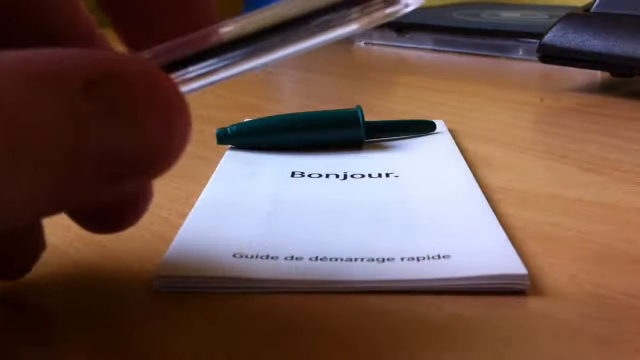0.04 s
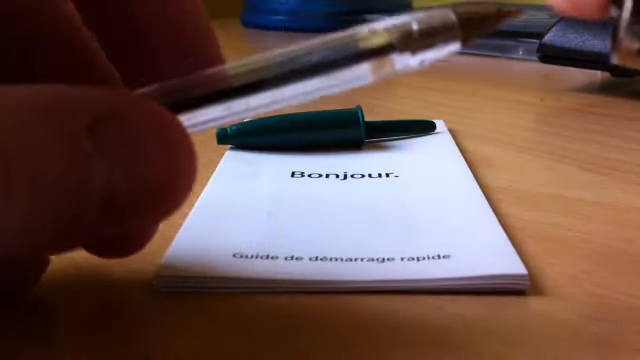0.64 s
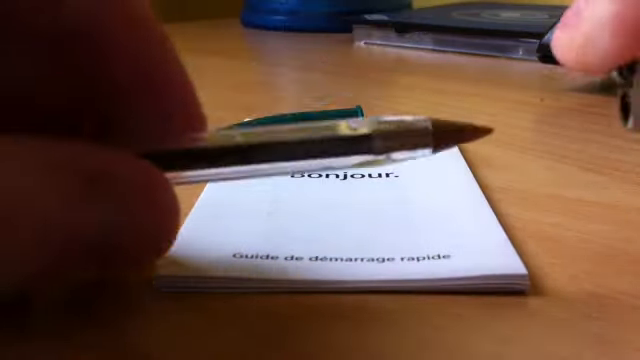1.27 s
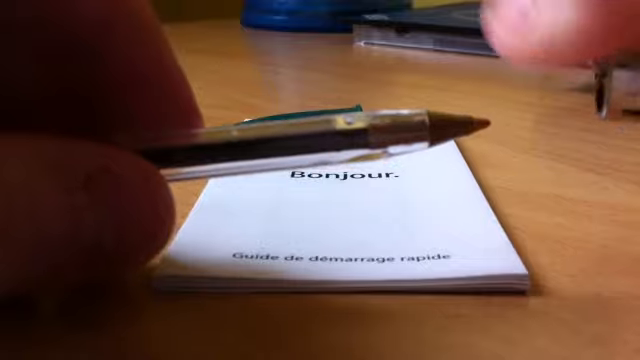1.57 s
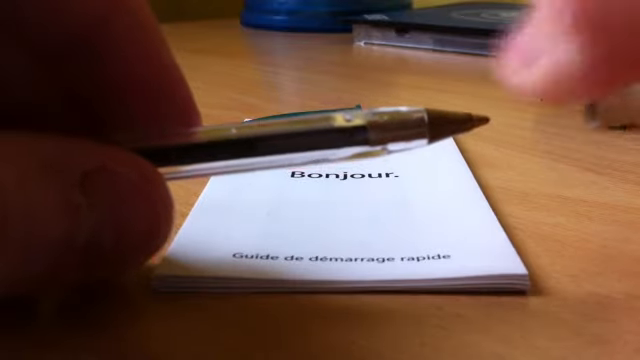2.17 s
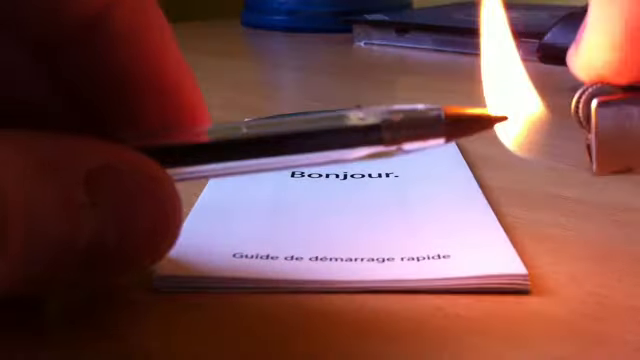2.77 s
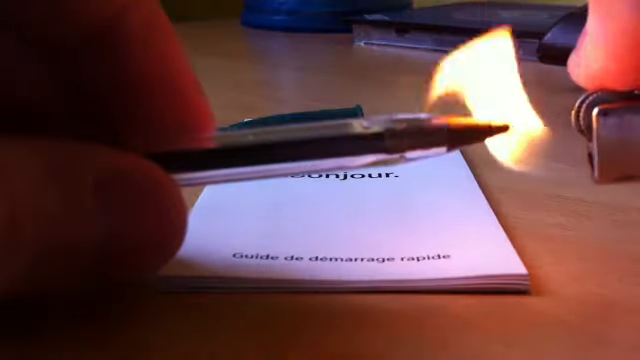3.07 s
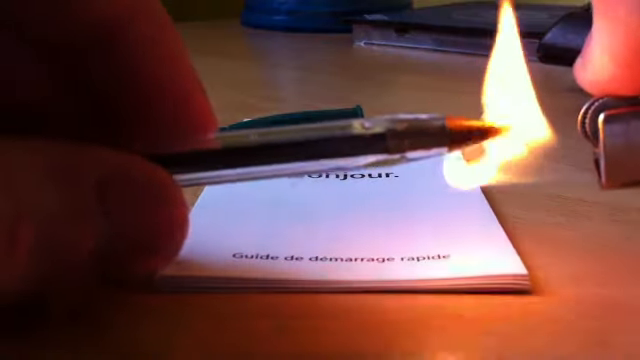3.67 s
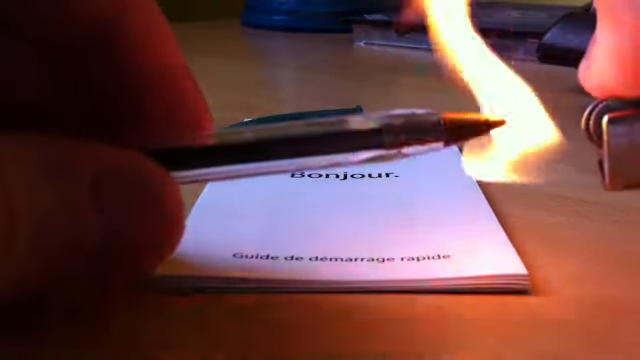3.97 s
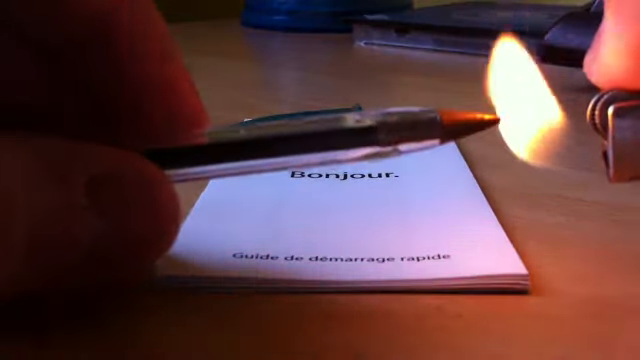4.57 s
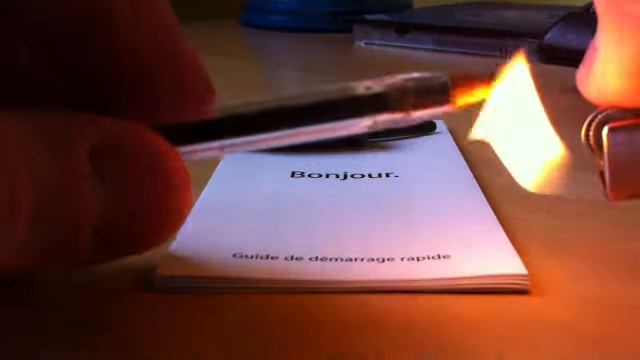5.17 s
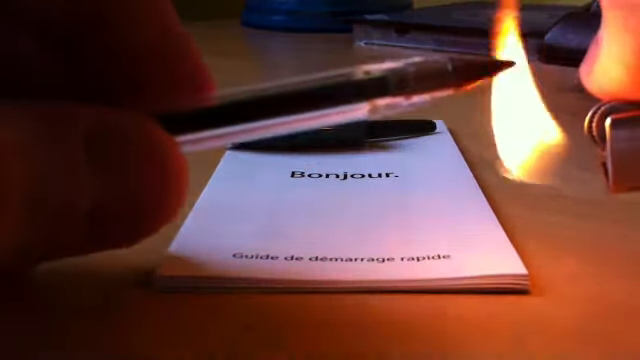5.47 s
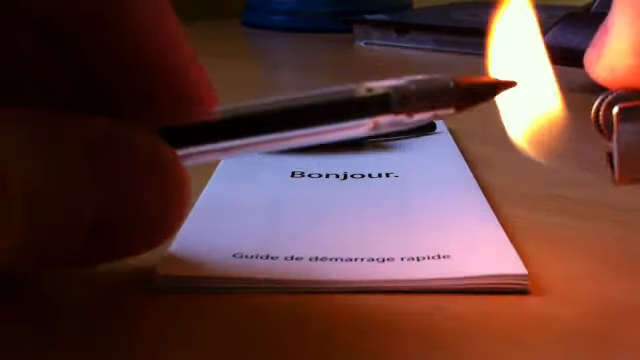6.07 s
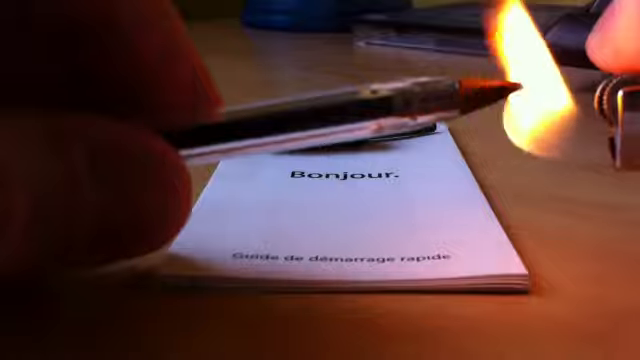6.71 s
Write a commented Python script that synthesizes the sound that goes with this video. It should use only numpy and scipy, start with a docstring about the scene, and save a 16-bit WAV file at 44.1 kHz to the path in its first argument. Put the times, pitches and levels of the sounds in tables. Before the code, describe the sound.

A pocket lighter is worked close to the microphone in a small quiet room. Its lever clicks a few times, letting out short hisses of gas. The wheel scrapes the flint once without catching, then a louder, faster strike with a slight metallic ring lights it. The flame burns on with a faint hollow hiss and gives a few soft pops as it flutters.

```python
"""Flint lighter, close up

A lighter is worked close to the microphone, over a desk in a small quiet room. The lever clicks
and gas hisses from the jet. The wheel scrapes the flint and sets the steel hood ringing: a first
spin fails, a second, faster one lights the gas. The flame burns with a faint hollow hiss from
the air in the hood and gives a few soft pops as it flutters."""
import sys
import numpy as np
from scipy import signal
from scipy.fft import rfft, irfft, next_fast_len
from scipy.io import wavfile

SR = 44100
rng = np.random.default_rng(int(sys.argv[2]) if len(sys.argv) > 2 else 0)


def inscribe(sig):
    """Save sig as 16-bit PCM at rate SR to the path in sys.argv[1].

    A 1-D sig is mono; a 2-D sig holds one channel per row.
    Samples are clipped to [-1, 1] before scaling.
    """
    pcm = np.round(np.clip(np.atleast_2d(sig).T, -1, 1) * 32767)
    wavfile.write(sys.argv[1], SR, pcm.astype(np.int16))


N = 301834
T = np.arange(N) / SR
SHORT = np.arange(4096) / SR   # seconds within one brief contact


def from_db(db):
    """Decibels to gain."""
    return 10 ** (np.asarray(db) / 20)


def rms_one(x):
    """Scale to rms 1."""
    return x / np.sqrt(np.mean(x ** 2) + 1e-20)


def cut(x, hz, kind, order=2):
    """Butterworth filter."""
    return signal.sosfilt(signal.butter(order, np.clip(hz, 10, .47 * SR), kind, fs=SR, output="sos"), x)


def add(out, s, sound):
    """Mix a short sound in at s seconds."""
    at = int(s * SR)
    out[at:at + len(sound)] += sound[:N - at]


def through(x, response):
    """Pass a sound through an impulse response."""
    return signal.oaconvolve(x, response)[:N]


def body(resonances, order=1):
    """Impulse response of parallel resonances, signs alternating; energy 1."""
    out = 0
    for k, (hz, width_hz, db) in enumerate(resonances):
        r = np.exp(-np.pi * width_hz / SR)
        gain = (1 - r * r) / 2
        feedback = [1, -2 * r * np.cos(2 * np.pi * hz / SR), r * r]
        ring = signal.unit_impulse(len(SHORT)) + 1e-18
        for _ in range(order):
            ring = signal.lfilter([gain, 0, -gain], feedback, ring)
        out = out + (-1) ** k * from_db(db) * ring
    return out / np.linalg.norm(out)


def noise(spectrum):
    """Steady noise shaped by (Hz, dB) points; rms 1."""
    hz, db = np.transpose(spectrum)
    size = next_fast_len(N)
    bins = np.maximum(np.fft.rfftfreq(size, 1 / SR), 1)
    shape = from_db(np.interp(np.log(bins), np.log(hz), db))
    return rms_one(irfft(rfft(rng.standard_normal(size)) * shape, size)[:N])


def resonant_noise(resonances):
    """White noise in steep-sided (Hz, width Hz, dB) resonances; rms 1."""
    return through(rng.standard_normal(N), body(resonances, order=2))


def drift(per_s):
    """A random wander through per_s points a second; rms 1."""
    knots = rng.standard_normal(N // 100)
    return rms_one(np.interp(T * per_s, np.arange(len(knots)), knots))


def burst(envelope, grit_db=3.0, flatten_passes=10):
    """Tiny contacts of uneven size under an envelope; each pass evens out their spectrum."""
    contacts, sizes = rng.standard_normal((2, len(envelope)))
    x = contacts * from_db(grit_db * sizes) * envelope
    for _ in range(flatten_passes):
        flat = irfft(np.exp(1j * np.angle(rfft(x))), len(x))
        x = flat * envelope ** (1 / flatten_passes)
    return x * np.linalg.norm(envelope) / np.linalg.norm(x)


def taps(rows):
    """Force of short blows that chatter out, each with its own brightness."""
    force = np.zeros(N)
    for s, db, decay_s, bright_hz in rows:
        add(force, s, from_db(db) * cut(burst(np.exp(-SHORT / decay_s)), bright_hz, "low"))
    return force


def thuds(rows):
    """Well damped blows, each one smooth push and pull of the air with no deep bass."""
    out = np.zeros(N)
    for s, db, hz in rows:
        phase = np.pi * hz * (SHORT - SHORT.mean())
        pulse = (2 * phase ** 2 - 1) * np.exp(-phase ** 2)
        add(out, s - SHORT.mean(), from_db(db) * cut(pulse, hz=116, kind="high", order=3))
    return out


# Room tone at the desk. Each row: frequency in Hz, relative density in dB.
ROOM_TONE = [(25, -7), (45, -21.5), (75, -26.5), (110, -17.5), (160, -10), (330, -9.5), (420, -17),
             (750, -11.5), (1050, -12.5), (1500, -16), (2400, -20), (5000, -22.5), (10500, -24.5),
             (15500, -27)]
# Set level of the low background: a brief hand rustle at first, then the recorder's gain ducks
# after the loud strike and slowly recovers. Each row: time in seconds, gain in dB.
BACKGROUND_LEVEL = [(0, 8), (.15, 1.5), (2.3, 2.5), (2.8, -5), (6.84, -0.5)]


def room_tone(floor_db=-62, drone_db=-73):
    """Low background noise with a drone in the room's resonances, under steady microphone hiss."""
    gain = from_db(np.interp(T, *np.transpose(BACKGROUND_LEVEL)))
    floor = from_db(floor_db) * noise(ROOM_TONE)
    low = cut(floor, 2080, "low", order=1)
    hiss = floor - low
    drone = from_db(drone_db) * resonant_noise([(195.5, 22, 4.5), (307, 150, -9.0)])
    return hiss + gain * (low + drone)


# The gas lever meets its stops, close to the microphone.
# Each row: start in seconds, level in dB, decay in seconds, brightness in Hz.
LEVER_CLICKS = [(0.6454, -42, 0.0075, 19000), (1.2462, -29.5, 0.0026, 8550), (1.7974, -33.5, 0.0043, 7800),
                (2.1556, -40.5, 0.0046, 5000), (2.3954, -23.5, 0.0024, 7060)]
# The lever's resonances. Each row: frequency in Hz, width in Hz, relative level in dB.
LEVER_MODES = [(1020, 130, -6), (2090, 99, -0.5), (2964, 260, 2), (4160, 320, 1.5), (4820, 226, -7.5),
               (5680, 340, -3.5), (7960, 280, -5), (10400, 590, -4.5), (11700, 800, -1),
               (13700, 1800, -0.5)]
CASE_HZ = 885   # pitch of a knock on the plastic case


def lever(ring_db=2, crack_db=-10, rattle_db=-20, rattle_s=0.0068, knock_db=2.5, thump_db=-18.5):
    """The lever snaps against its stops with a dry click, rattles briefly and knocks the case."""
    rattles, blows = [], []
    for s, db, _, bright_hz in LEVER_CLICKS:
        rattles.append((s + 0.008, db + rattle_db, rattle_s, bright_hz))
        blows.append((s + 0.00072, db + knock_db, CASE_HZ))
        blows.append((s + 0.00355, db + thump_db, 245))   # a low thump follows the knock
    force = taps(LEVER_CLICKS) + taps(rattles)
    ring = from_db(ring_db) * through(force, body(LEVER_MODES))
    return ring + from_db(crack_db) * force + thuds(blows)


# Unlit gas leaves the valve. Each row: opening time in seconds, start of closing in seconds,
# settled level in dB, closing rate in dB per second.
VALVE_OPENINGS = [(1.26, 1.454, -58, 230), (1.795, 2.16, -58, 700), (2.392, 2.495, -65, 300)]
# The bare jet's resonances. Each row: frequency in Hz, width in Hz, relative level in dB.
JET_MODES = [(1220, 400, -4.5), (2090, 370, 1), (2940, 420, 0.5), (3640, 550, -3.5), (4480, 530, -9),
             (5680, 910, -9.5), (7810, 1500, -16.5), (10100, 1400, -10.5), (11230, 740, -8.5),
             (13210, 2900, -12)]


def gas(spurt_db=14, spurt_s=0.036, opening_s=0.0035, flutter_db=2.0):
    """Gas held in the nozzle spurts out first; the jet then hisses until the valve closes."""
    flow = 0
    for opens, closes, db, closing_db_per_s in VALVE_OPENINGS:
        age = np.maximum(T - opens, 0)
        closing_db = closing_db_per_s * np.maximum(T - closes, 0)
        level_db = db + spurt_db * np.exp(-age / spurt_s) - closing_db
        flow = flow + np.minimum(age / opening_s, 1) * from_db(level_db)
    return flow * from_db(flutter_db * drift(per_s=41.3)) * resonant_noise(JET_MODES)


# Two spins of the wheel. Each row: time of the last, hardest bite in seconds, its level in dB,
# gap between teeth in seconds, growth per tooth in dB, bite length in seconds,
# grinding level in dB, grinding rise in seconds.
WHEEL_SPINS = [(1.9047, -21.5, .0135, 5.5, 0.0037, -42.5, .035),
               (2.427, -10.5, .006, 23, .0036, -24.5, 0.0058)]


def wheel(teeth=4, grind_stop_s=0.0067):
    """Force on the flint: teeth bite ever harder, and grinding swells until the wheel slips free."""
    force = np.zeros(N)
    t = SHORT - SHORT.mean()
    for s, db, tooth_s, growth_db, bite_s, grind_db, rise_s in WHEEL_SPINS:
        for k in range(teeth):   # counting back from the last bite
            bite = burst(np.exp(-(SHORT / bite_s) ** 4))
            add(force, s - k * tooth_s, from_db(db - k * growth_db) * bite)
        swell = np.exp(np.minimum(t / rise_s, -t / grind_stop_s))
        add(force, s + t[0], from_db(grind_db) * burst(swell, flatten_passes=0))
    return force


# Clusters of close modes in the steel.
# Each row: centre in Hz, width in Hz, level in dB, seconds to fall 60 dB.
STEEL_CLUSTERS = [(1980, 180, -24.5, 0.13), (4380, 580, -24, 0.43), (4930, 200, -35, 0.342),
                  (10300, 500, -35, 0.24), (12100, 470, -36, 0.2), (13100, 700, -31, 0.24)]


def steel_ring(force):
    """The struck steel rings on faintly; its close modes beat against each other as they die."""
    t, response = T[:SR // 2], 0
    for hz, width_hz, db, t60 in STEEL_CLUSTERS:
        dying_noise = rng.standard_normal(len(t)) * from_db(-60 * t / t60)
        ring = signal.oaconvolve(dying_noise, body([(hz, width_hz, 0)], order=2))
        response = response + from_db(db) * ring / np.linalg.norm(ring)
    return through(force, response)


# Resonances of hood and wheel. Each row: frequency in Hz, width in Hz, relative level in dB.
HOOD_MODES = [(1250, 114, -6), (2060, 205, -7), (3423, 97, 6), (4156, 100, 3.5), (4730, 160, -2.5),
              (6280, 700, -8.5), (7680, 320, -9.5), (8450, 110, -4.5), (8620, 160, -12.5),
              (9300, 320, -5.5), (11090, 360, -1.5), (12010, 215, 2), (12370, 440, -1), (14000, 256, -6),
              (14720, 300, -6.5), (15400, 160, -14)]


def flint_scrape(force, crack_db=-13, crack_hz=700, squeal_db=-10, first_spin_end_s=2.0):
    """The bites crack and shake the hood; the flint squeals only on the first, slow spin."""
    slow_spin = force * (T < first_spin_end_s)
    squeal = from_db(squeal_db) * through(slow_spin, body([(13600, 760, 0)], order=2))
    crack = from_db(crack_db) * cut(force, crack_hz, "high", order=1)
    return through(force, body(HOOD_MODES)) + squeal + crack


# Light taps on the rim. Each row: start in seconds, level in dB, decay in seconds, brightness in Hz.
RIM_TAPS = [(1.8703, -33, 0.0014, 16000), (1.918, -34, .003, 6000), (2.1275, -43.5, .0019, 8000),
            (2.1332, -40, 0.0017, 5000), (2.2225, -41, 0.0021, 3000), (2.2645, -47.5, .001, 2800),
            (2.4295, -24, 0.0014, 4200)]
# The rim's resonances. Each row: frequency in Hz, width in Hz, relative level in dB.
RIM_MODES = [(3530, 130, 3), (4100, 340, -9), (4830, 350, -6), (11000, 920, -10), (13300, 1200, -7)]


def rim_pings(gain_db=4.0):
    """The loose wheel taps the rim of the hood, which pings."""
    return from_db(gain_db) * through(taps(RIM_TAPS), body(RIM_MODES))


# The thumb slips off the wheel onto the case.
# Each row: start in seconds, bump level in dB, knock level in dB, gap between bumps in seconds.
THUMB_LANDINGS = [(1.902, -37, -32, .012), (2.439, -37.5, -25.5, 0.0098)]


def thumb(bumps=3, bump_hz=209, bump_growth_db=0.3, knock_loss_db=4,
          push_db=-11, push_s=.025, push_hz=55):
    """The thumb lands in a short run of dull bumps that knock the case and push a little air."""
    blows, pushes = [], []
    for s, bump_db, knock_db, gap_s in THUMB_LANDINGS:
        pushes.append((s, bump_db + push_db, push_s, push_hz))
        for k in range(bumps):
            blows.append((s + k * gap_s, bump_db + k * bump_growth_db, bump_hz))
            blows.append((s + k * gap_s, knock_db - k * knock_loss_db, CASE_HZ))
    return thuds(blows) + taps(pushes)


# Air in the hood under the flame. Each row: resonance in Hz, width in Hz, relative level in dB.
CAVITY_MODES = [(1250, 340, -5), (1963, 192, -1), (2168, 240, 1), (2727, 247, -6.5), (3035, 235, -4.5),
                (3385, 160, -3.5), (3510, 1900, -14.5)]
# The nozzle's thin hiss, heard close. Each row: frequency in Hz, relative density in dB.
NOZZLE_SPECTRUM = [(3000, -12), (4500, -22.5), (5800, -6), (6700, -10), (7650, 2), (8300, -6.5),
                   (9250, 2.5), (9900, -20), (11400, -7), (12400, -16), (13500, -2), (15600, -13.5)]
# The flame flares. Each row: peak time in seconds, level in dB, half length in seconds.
FLAME_FLARES = [(4.014, -63, 0.032), (4.375, -61.5, 0.033), (4.575, -56.5, 0.055), (6.033, -65, 0.11)]


def flame(lit_s=2.55, hollow_rise_s=1.04, hiss_rise_s=0.4, calm_db=-73, flutter_db=4.0, waver_db=0.85):
    """The burning jet sounds the air in the hood, over the nozzle's hiss; flares add a low flutter."""
    age = np.maximum(T - lit_s, 0)
    # tone and hiss rise and level off as the flame grows
    hollow_db = -56.5 - 11 * np.exp(-age / hollow_rise_s)
    hiss_db = -66.5 - 15.5 * np.exp(-age / hiss_rise_s)
    hollow = from_db(hollow_db) * resonant_noise(CAVITY_MODES)
    hiss = from_db(hiss_db - waver_db * drift(per_s=1.9)) * noise(NOZZLE_SPECTRUM)
    flares = sum(from_db(db) * np.exp(-((T - s) / half_s) ** 2) for s, db, half_s in FLAME_FLARES)
    flutter = (from_db(calm_db) + flares) * from_db(flutter_db * drift(per_s=60))
    rush = noise([(40, -29), (130, 3.0), (280, -3), (700, -2.5), (1700, -4.5), (3500, -11), (8000, -42)])
    return (hollow + hiss + flutter * rush) * (T > lit_s)


# The flame pops near the microphone. Each row: time in seconds, level in dB, pitch in Hz,
# swell level in dB, the stutter's lead in seconds, how much weaker the stutter is in dB.
FLAME_POPS = [(3.177, -40.5, 897, -49.5, 0.026, 3), (4.02, -43.5, 800, -52.5, .012, 10),
              (4.56, -21, 614, -28.5, 0.012, 16), (4.855, -39, 670, -44, .026, 3),
              (5.761, -41.5, 800, -47, 0.015, 1)]


def pops(swell_hz=230, swell_lag_s=0.0034):
    """The flame stutters, then collapses with a soft snap; a slower swell of hot air follows."""
    blows = []
    for s, db, hz, swell_db, lead_s, weaker_db in FLAME_POPS:
        for at, loss_db in (s - lead_s, weaker_db), (s, 0):
            blows += [(at, db - loss_db, hz), (at + swell_lag_s, swell_db - loss_db, swell_hz)]
    return thuds(blows)


# The small room's tail, heard from the desk.
# Each row: band centre in Hz, level in dB, seconds to fall 60 dB.
ROOM_TAIL = [(171.6, -10, 0.18), (403, -8.5, 0.37), (980, -10.5, 0.15), (2280, -8.5, 0.29),
             (3150, -22.5, 0.19), (4720, -11, 0.36), (7450, -12, 0.36), (13840, -17, 0.25)]


def room(direct, build_s=0.017):
    """Behind the direct sound, wall echoes thicken and then die away band by band."""
    t, response = T[:SR * 2 // 3], 0
    centres = np.array(ROOM_TAIL)[:, 0]
    edges = [60, *np.sqrt(centres[1:] * centres[:-1]), 18000]
    for (_, db, t60), low, high in zip(ROOM_TAIL, edges, edges[1:]):
        envelope = from_db(-60 * t / t60) * np.minimum(t / build_s, 1) ** 2
        echoes = cut(rng.standard_normal(len(t)), [low, high], "band", order=3)
        response = response + from_db(db) * echoes * envelope / np.linalg.norm(envelope)
    return direct + through(direct, response)


def scene():
    """The lighter over the desk with the quiet room around it, in mono."""
    bites = wheel()
    metal = flint_scrape(bites) + rim_pings() + steel_ring(bites)
    lighter = metal + lever() + thumb() + gas() + flame() + pops()
    return (room(lighter) + room_tone())[None]


def record(dry, bass_hz=95, top_hz=16300):
    """One small microphone, close to the lighter: the bass rolls off and the top is cut steeply."""
    top_cut = signal.ellip(10, .1, 80, top_hz, fs=SR, output="sos")
    return signal.sosfilt(top_cut, cut(dry, bass_hz, "high", order=1))


dry = scene()
out = record(dry)
inscribe(out)
```